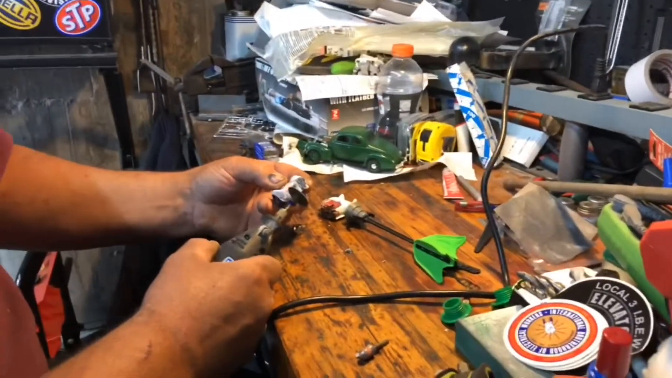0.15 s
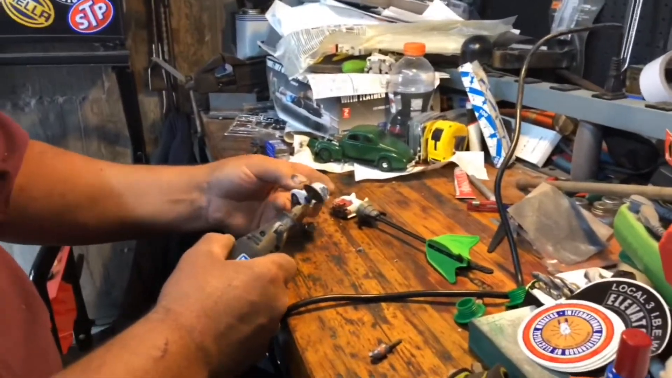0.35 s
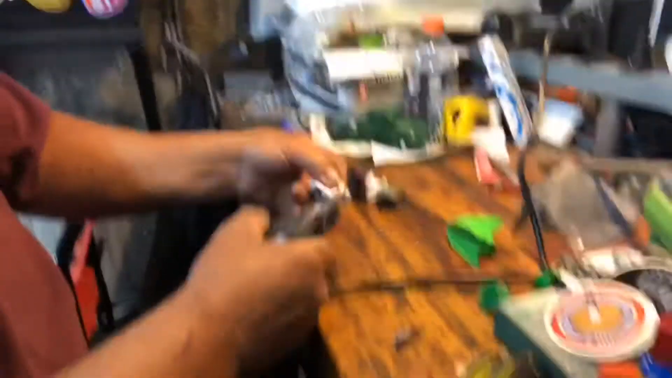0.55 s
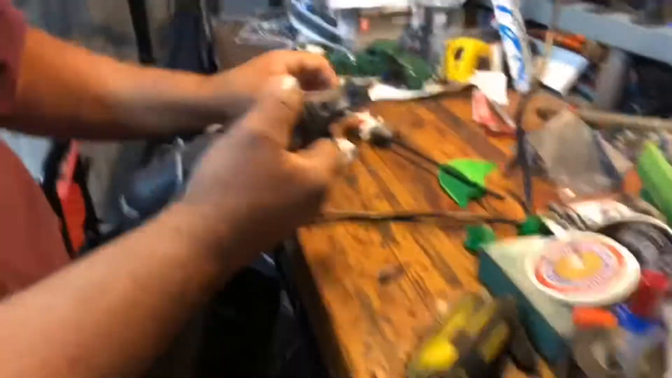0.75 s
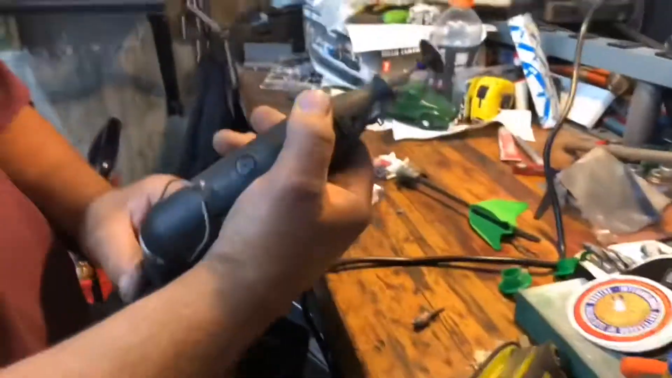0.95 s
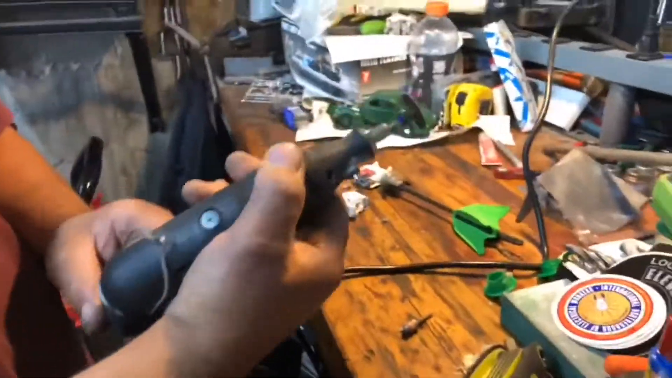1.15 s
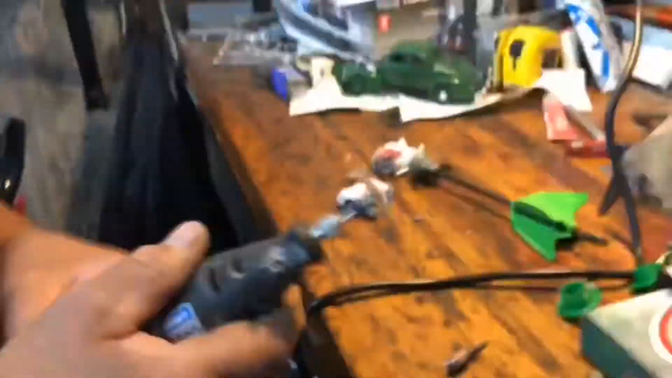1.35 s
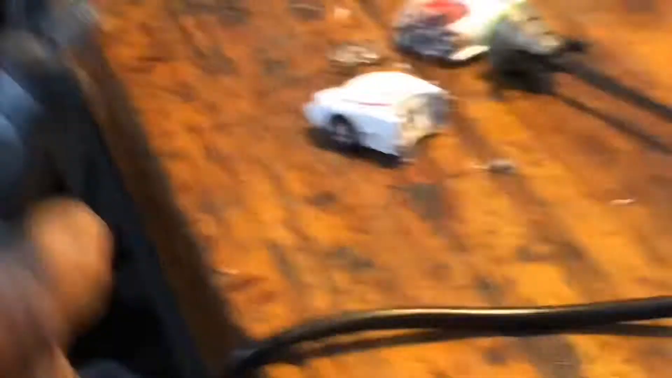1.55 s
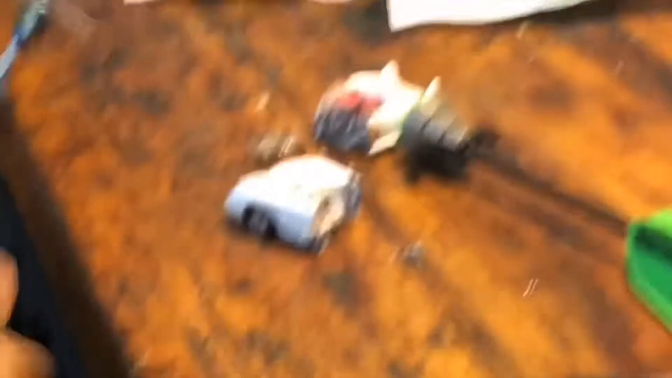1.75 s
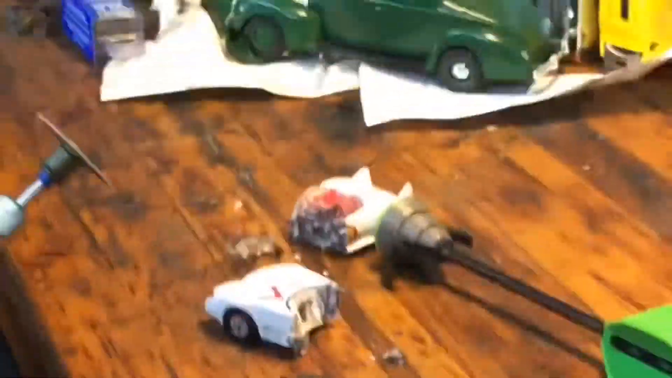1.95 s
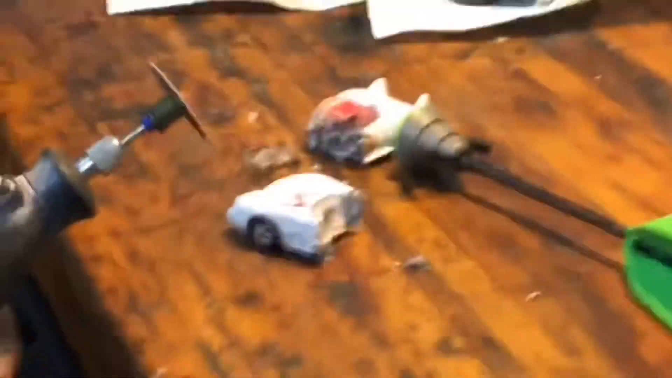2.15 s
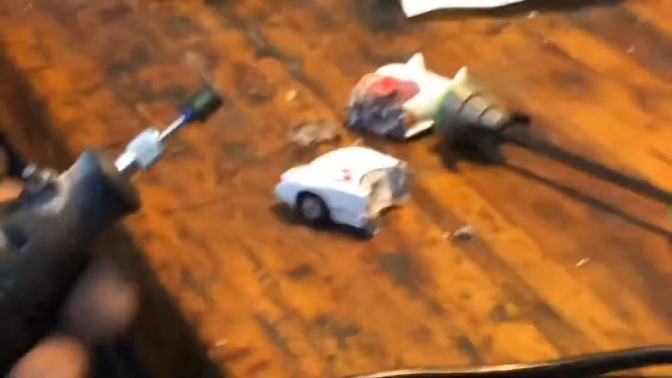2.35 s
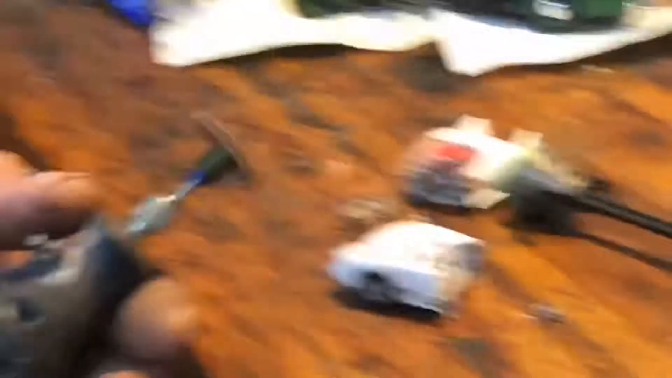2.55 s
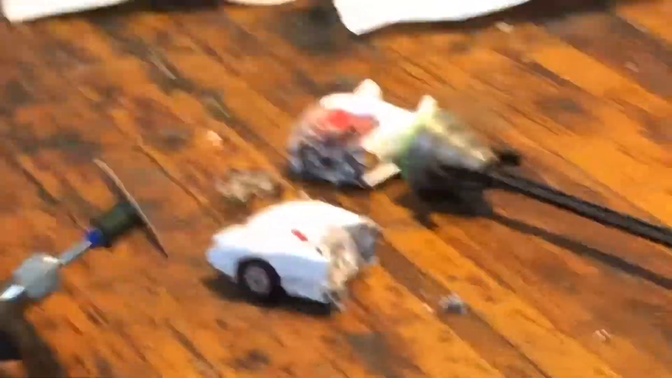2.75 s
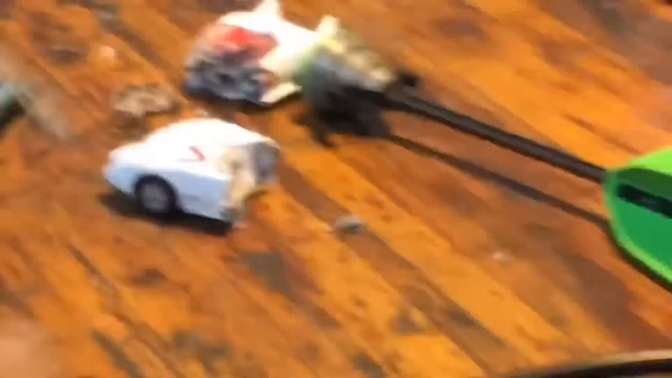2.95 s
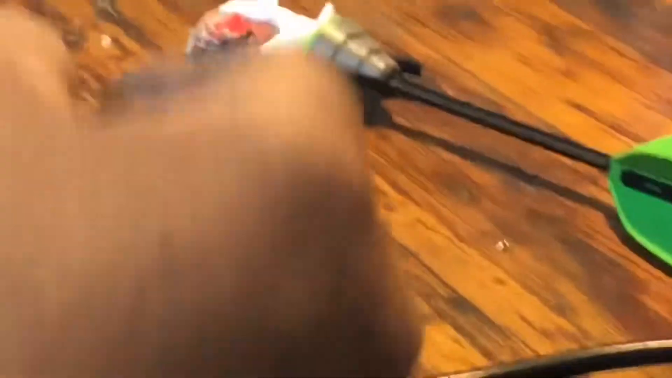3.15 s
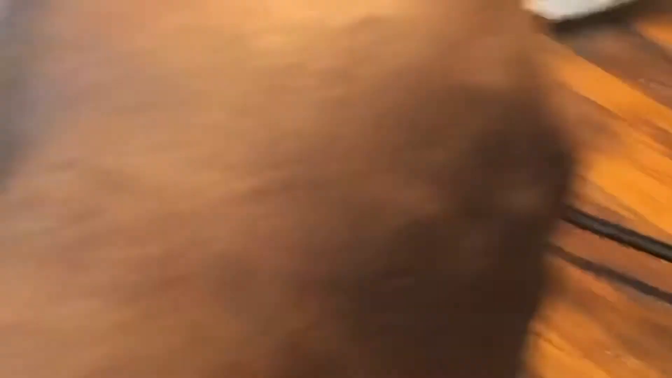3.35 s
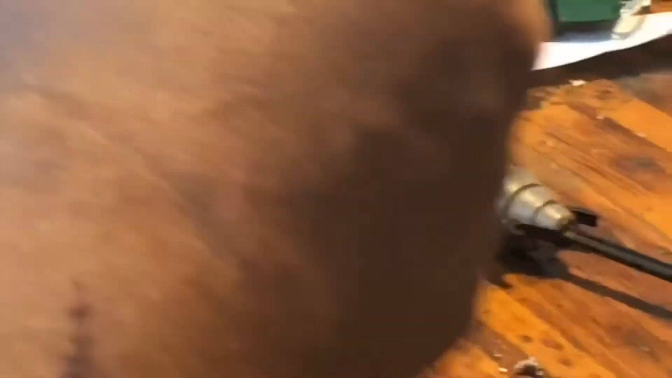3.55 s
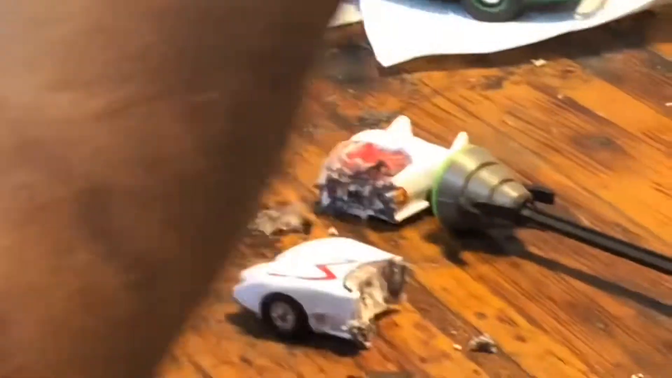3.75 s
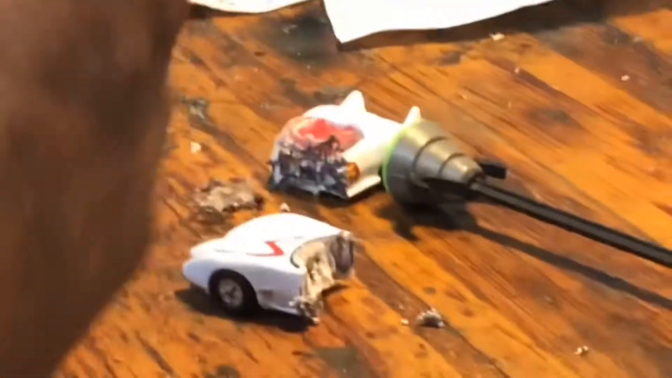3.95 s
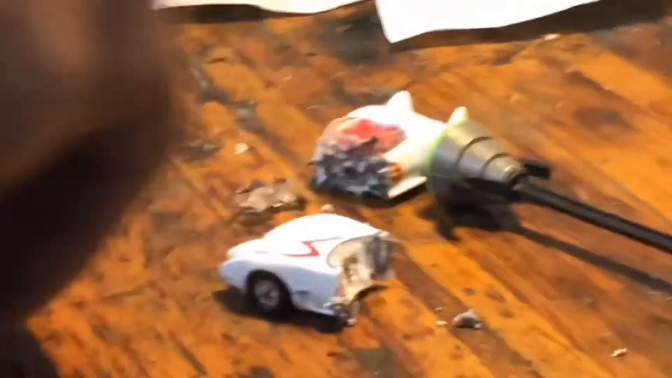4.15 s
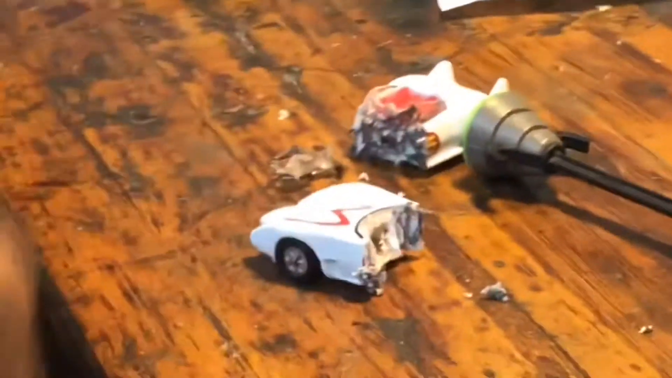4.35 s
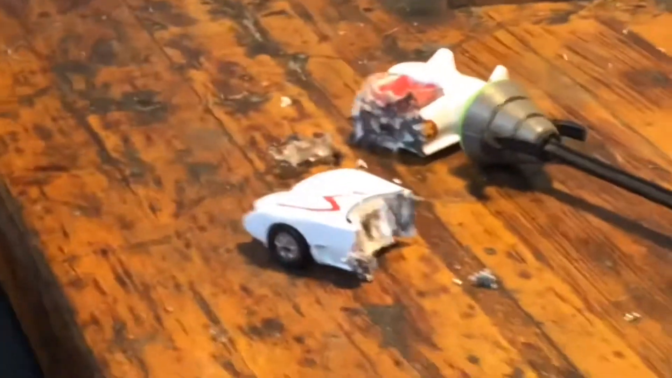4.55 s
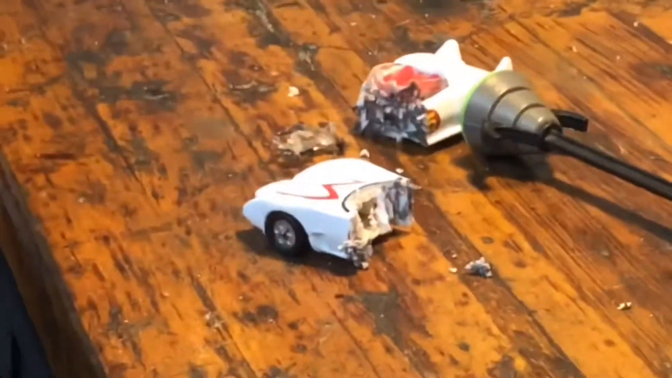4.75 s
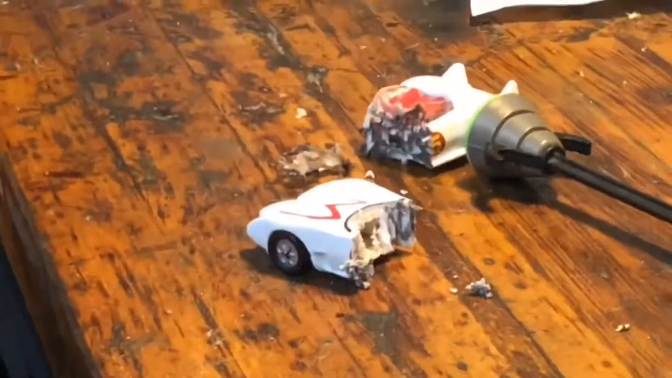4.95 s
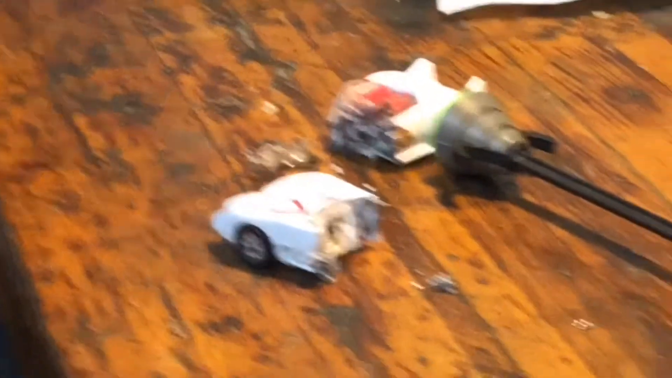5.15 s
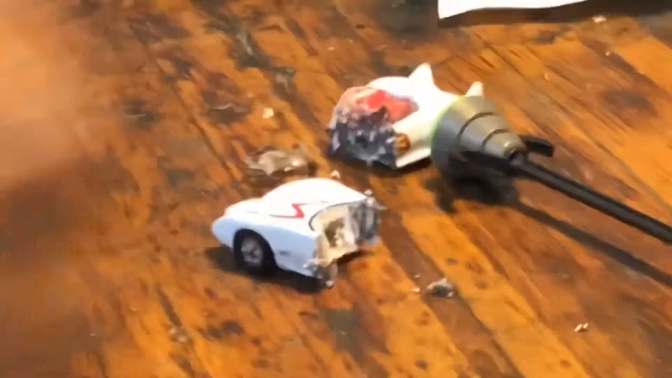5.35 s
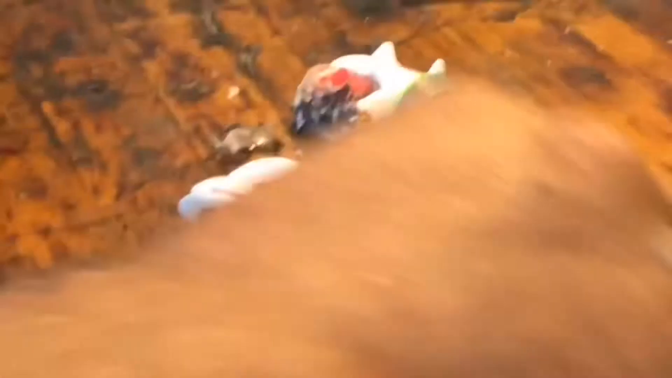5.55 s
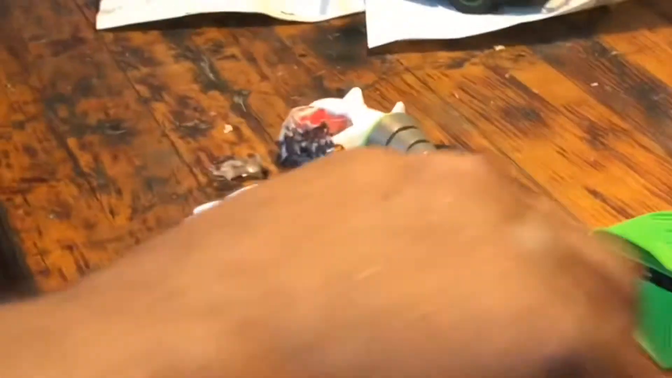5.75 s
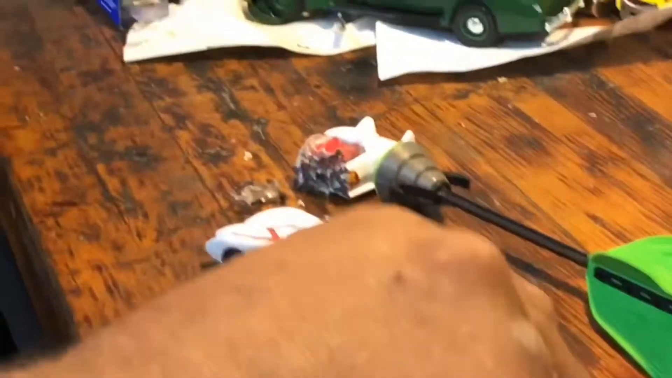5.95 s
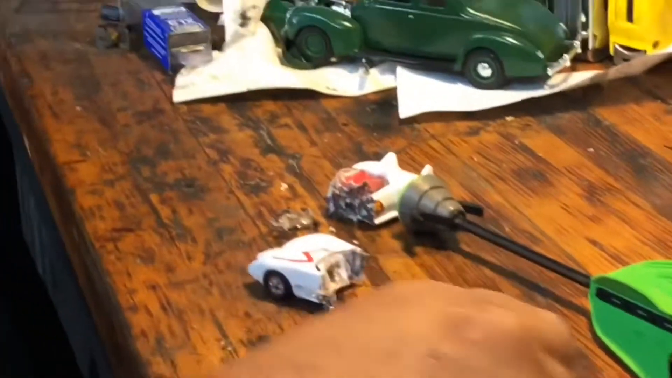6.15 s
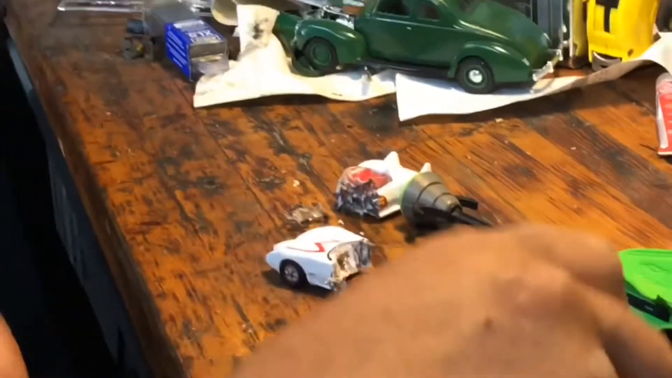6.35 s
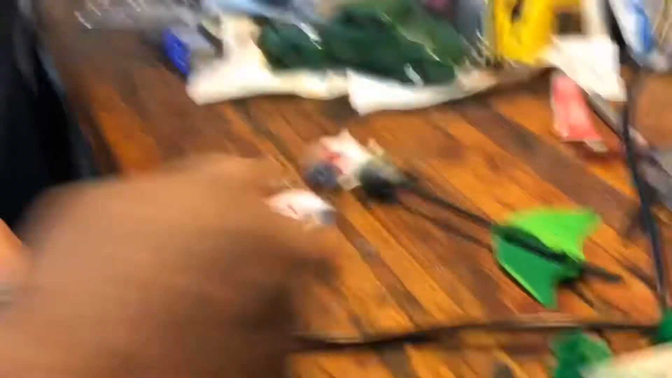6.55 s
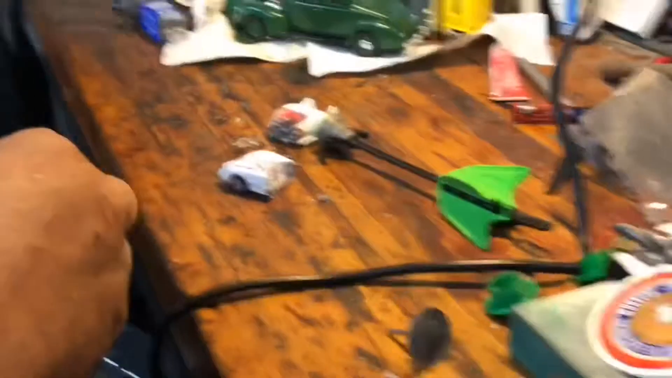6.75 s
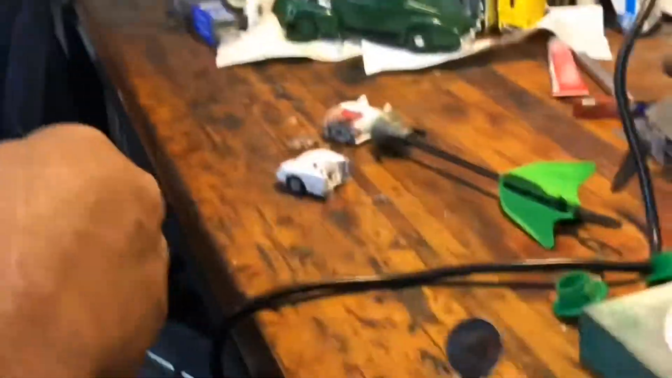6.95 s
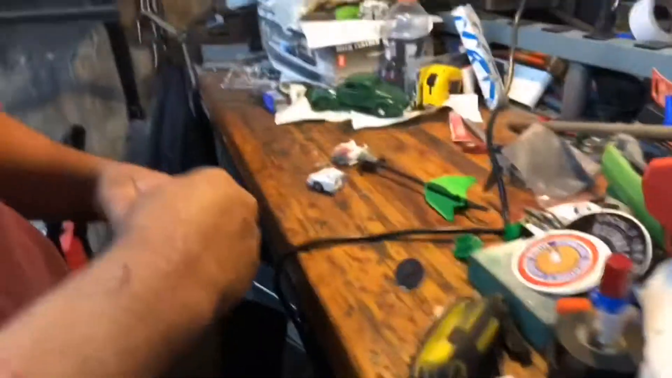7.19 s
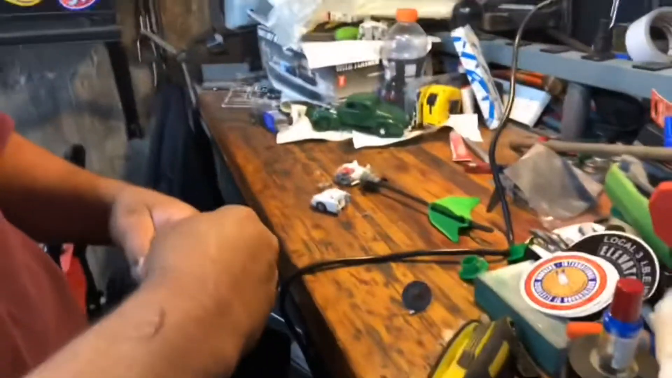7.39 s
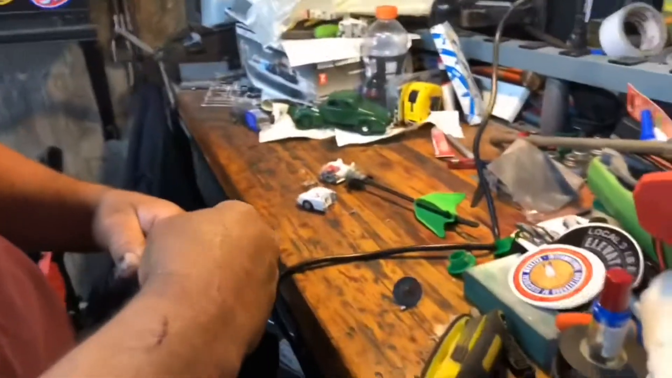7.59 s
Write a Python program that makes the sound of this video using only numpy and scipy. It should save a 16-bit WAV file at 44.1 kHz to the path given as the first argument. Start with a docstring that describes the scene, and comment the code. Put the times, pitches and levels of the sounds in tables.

```python
"""At a wooden workbench a corded rotary tool whines near 51000 rpm, is switched off and starts to slow;
the sound then skips ahead to its last slow turns. Shaft-locked sines and cyclic noise make the tool.
Knocks run through the bench top as falling chirps; small parts click as bursts with decaying modes;
coloured noise under rounded arches gives hands rubbing wood and the shell droning as it drags.
Fingers scuff, the cutting disc pings, and a quiet shop noise lies under the later part."""
import sys
import numpy as np
from scipy import signal
from scipy.fft import rfft, irfft, next_fast_len
from scipy.io import wavfile

SR = 44100
rng = np.random.default_rng(int(sys.argv[2]) if len(sys.argv) > 2 else 0)


def pcm_store(signal):
    """Save signal as 16-bit PCM."""
    levels = np.round(np.clip(np.atleast_2d(signal), -1, 1) * 32767)
    wavfile.write(sys.argv[1], SR, levels.astype(np.int16).T)


N = 336042
TIME = np.arange(N) / SR
OFF_S, SKIP_S = 0.968, 1.42   # switch-off, and the skip to the last turns
CUTOFF_HZ = 15750   # upper limit of the sound
CAGE_TURNS = 7   # shaft turns after which the bearing's balls are back in the same places

# spectrum of the fan's turbulent air: [f/Hz, relative level/dB]
FAN_AIR = [(5000, -29.5), (8000, -16), (9500, -5.5), (11500, 6), (14000, 0.5), (16000, -4.5)]
# spectrum of a hand's swish: [f/Hz, relative level/dB]
SWISH = [(120, -14.5), (280, -3.5), (430, 3.5), (700, 1.5), (1100, -6), (1600, -15), (2600, -15.5),
         (4000, -30), (8000, -49)]


def from_db(db):
    """Level to amplitude: 20 dB is a factor of ten."""
    return 10 ** (np.asarray(db) / 20)


def rms_one(x):
    """Normalisation to unit effective value."""
    return x / np.sqrt(np.mean(x ** 2) + 1e-20)


def in_time(rows):
    """Linear interpolation of each column after the first at every sample."""
    s, *columns = np.transpose(rows)
    return [np.interp(TIME, s, column) for column in columns]


def gain_at(points, hz):
    """Frequency response: level interpolated over logarithmic frequency."""
    f, db = np.transpose(points)
    return from_db(np.interp(np.log(np.maximum(hz, 1)), np.log(f), db))


def moving_gain(points, hz):
    """Frequency response followed along a gliding tone, renewed every 64 samples."""
    return gain_at(points, hz[::64]).repeat(64)[:N]


def drift(rate):
    """Slow random modulation of unit rms with about rate new values a second."""
    knots = rng.standard_normal(4096)
    return rms_one(np.interp(TIME * rate, np.arange(len(knots)), knots))


def coloured(x, colour):
    """Linear filtering by a spectrum, with the deepest bass eased off, to unit rms."""
    size = next_fast_len(N)
    hz = np.fft.rfftfreq(size, 1 / SR)
    spectrum = rfft(x, size) * gain_at(colour, hz) * hz / (hz + 20)
    return rms_one(irfft(spectrum, size)[:N])


def noise(colour):
    """Stationary random noise shaped to a spectrum."""
    return coloured(rng.standard_normal(N), colour)


def band(x, low_hz, high_hz):
    """Causal band-pass filtering."""
    return signal.sosfilt(signal.butter(2, [low_hz, high_hz], "band", fs=SR, output="sos"), x)


def swell(s, rise):
    """Critically damped response: a burst that peaks at 1 after its rise time and dies away."""
    age = np.clip((TIME - s) / rise, 0, 50)
    return age * np.exp(1 - age)


def stroke(middle, length):
    """Kinematics of a movement that gathers speed and slows: a rounded arch of height 1."""
    place = np.clip((TIME - middle) / length, -0.5, 0.5)
    return np.maximum(np.cos(np.pi * place), 0) ** 1.07


def order_tone(turns, multiple, flutter_db, smear):
    """Order synchronism: a tone locked to the shaft, wavering in level and in phase (radians)."""
    phase = 2 * np.pi * (multiple * turns + rng.random()) + smear * drift(70)
    return np.sqrt(2) * np.sin(phase) * from_db(flutter_db * drift(16))


def once_a_turn(turns, depth):
    """Amplitude modulation: brushes and fan blades chop the hiss in step with the shaft."""
    return 1 + depth * (np.cos(2 * np.pi * turns) + np.cos(4 * np.pi * turns)) / 2


def worn_track(laps, size):
    """Cyclic excitation: roughness recurs on every lap, a dense buzz whose mix keeps shifting."""
    one, other = signal.resample(rng.standard_normal((2, size)), 8192, axis=1)
    place = (laps % 1 * len(one)).astype(int)
    blend = 2.5 * drift(9)
    return np.cos(blend) * one[place] + np.sin(blend) * other[place]


def switched_off(drop_db, drop_s, fade_db_per_s):
    """Decay without drive: a smooth drop after switch-off and a steady fade."""
    age = np.maximum(TIME - OFF_S, 0)
    drop = np.sin(np.pi / 2 * np.minimum(age / drop_s, 1)) ** 2
    return from_db(-drop_db * drop - fade_db_per_s * age)


def shaft_orders(turns, loose, first_db, second_db, fourth_db):
    """Forced vibration: unbalance excites order 1, the motor's hum order 2, and order 4 joins them."""
    unbalance = order_tone(turns, 1, flutter_db=0.45 * loose ** 3, smear=0.03 * loose ** 3)
    unbalance *= from_db(first_db) * switched_off(drop_db=14, drop_s=0.19, fade_db_per_s=6)
    hum = order_tone(turns, 2, flutter_db=0.5, smear=0.04)
    hum *= from_db(second_db) * switched_off(drop_db=25, drop_s=0.028, fade_db_per_s=11)
    flare_db = 11 * swell(OFF_S, rise=0.018)   # order 4 rings out as the current breaks
    fourth = order_tone(turns, 4, flutter_db=0.7, smear=0.05)
    fourth *= from_db(fourth_db + flare_db) * switched_off(drop_db=43, drop_s=0.18, fade_db_per_s=10)
    return unbalance + hum + fourth


def housing_whine(turns, hz, loose):
    """Resonant radiation: the housing weights each shaft order at its moving frequency."""
    # weaker shaft orders at speed: [order, relative level/dB]
    weak_orders = [(3, -7), (5, -7), (6, -5), (7, -8), (8, -11), (9, -14), (10, -16), (11, -26), (12, -25),
                   (13, -25), (14, -26), (15, -27), (16, -26), (17, -29), (18, -17)]
    # housing response to the shaft orders: [f/Hz, relative level/dB]
    housing_response = [(1000, -24.5), (2000, -22.5), (2800, -14.5), (4000, -14.5), (4850, 7), (5500, -15),
                        (6500, -4), (8000, -15), (12000, -16), (16000, -30.5)]
    out = 0
    for order, db in weak_orders:
        radiated = moving_gain(housing_response, order * hz)
        tone = order_tone(turns, round(order), flutter_db=2.5 * loose, smear=0.012 * order * loose)
        out = out + from_db(db) * radiated / radiated[N // 16] * tone
    return out


def ball_bearing(turns, hz, loose):
    """Epicyclic kinematics: rolling balls give tones between the shaft orders."""
    # bearing tones: [offset/orders, relative level/dB]
    ball_offsets = [(.285, -3), (.43, -6), (.715, 0)]
    # housing response to the ball tones: [f/Hz, relative level/dB]
    ball_response = [(1000, -13.5), (2000, -20), (2800, -5.5), (4000, -7), (4850, -2), (5500, -6),
                     (6500, -8), (8000, -15), (12000, -19)]
    out = 0
    for offset, db in ball_offsets:
        for k in range(1, 10):
            order = k + offset
            tone = order_tone(turns, order, flutter_db=5, smear=0.5 * loose ** 2)
            out = out + from_db(db) * moving_gain(ball_response, order * hz) * tone
    return out


def brush_hiss(turns):
    """Sliding friction: broadband brush noise modulated by the rotation."""
    # brush noise spectrum: [f/Hz, relative level/dB]
    brush_colour = [(40, -60), (70, -28), (150, -11), (700, -16.5), (1300, -17), (2000, -9), (3000, -2.5),
                    (4800, 2), (6500, 3.5), (8300, -2.5), (9500, -7), (16000, -28)]
    chopped = noise(brush_colour) * once_a_turn(turns, depth=1.0)
    return rms_one(band(chopped, 90, CUTOFF_HZ)) * from_db(drift(60))


def bearing_buzz(turns):
    """Periodic roughness: the bearing's pattern repeats every few turns."""
    # buzz spectrum: [f/Hz, relative level/dB]
    buzz_colour = [(500, -51), (1500, -12.5), (3000, -4.5), (5000, 4), (6500, 2.5), (9000, -11.5),
                   (16000, -18)]
    return coloured(worn_track(turns / CAGE_TURNS, size=256), buzz_colour)


def fan_rush(turns, hz, age, unpowered):
    """Aerodynamic noise: turbulence modulated by the blades, with tones that stand out without power."""
    # fan and commutator tones: [order, level against the fan air/dB]
    singing_orders = [(4, -9), (5, -13), (7, -6), (8, -12), (16, -9), (18, -3), (21, -18), (23, -18),
                      (25, -16)]
    sing = 0
    for order, db in singing_orders:
        tone = order_tone(turns, order, flutter_db=3.5, smear=0.4)
        sing = sing + from_db(db) * tone * (order * hz < CUTOFF_HZ)
    blades = coloured(worn_track(turns / CAGE_TURNS, size=360), FAN_AIR)   # shaft wobble roughens the rush
    rush = from_db(-2.0) * noise(FAN_AIR) * once_a_turn(turns, depth=0.38)
    # the air grows by 10 dB/s as the vents swing round and fades by 27.5 dB/s after switch-off
    air_db = -36.5 - 10 * np.maximum(OFF_S - TIME, 0) - 27.5 * age
    return from_db(air_db) * (rush + from_db(-10.0) * blades + unpowered * sing)


def running_tool():
    """Rotor dynamics: all tones follow one shaft, which air drag slows exponentially after switch-off."""
    # tool turned in the hand: [t/s, powered shaft f/Hz, order 1 level/dB, order 2 level/dB,
    # order 4 level/dB, common bearing and brush level/dB], before the switch-off gains
    powered_run = [(0.0, 817, -34.5, -36.5, -39, -33), (0.024, 816, -35.5, -40.5, -55.5, -36),
                   (0.06, 829.4, -35, -38, -27, -31), (0.154, 848.4, -30.5, -31.5, -24.5, -29),
                   (0.288, 861, -30, -21.5, -28.5, -25.5), (0.456, 854.4, -29, -25, -32, -27.5),
                   (0.612, 849.6, -23.5, -29, -25.5, -28.5), (0.738, 851, -27, -40, -31.5, -26.5),
                   (0.82, 853.6, -31, -31, -27.5, -27.5), (0.96, 856.6, -30.5, -34, -36.5, -26)]
    powered_hz, first_db, second_db, fourth_db, bearing_db = in_time(powered_run)
    age = np.maximum(TIME - OFF_S, 0)
    hz = powered_hz * np.exp(-age / 0.88)   # time constant in s
    turns = np.cumsum(hz) / SR
    unpowered = np.minimum(age / 0.07, 1)
    loose = 1 + unpowered   # without drive the rotor floats in its bearings and the tones waver

    motor = from_db(-2.5 - 4.3 * unpowered) * housing_whine(turns, hz, loose)
    motor += from_db(-13.5) * ball_bearing(turns, hz, loose)
    motor += from_db(-5.5) * brush_hiss(turns) + from_db(-15.5) * bearing_buzz(turns)
    motor *= from_db(bearing_db) * switched_off(drop_db=5, drop_s=0.082, fade_db_per_s=32)
    orders = shaft_orders(turns, loose, first_db, second_db, fourth_db)
    # the hand shifts on the shell
    grip = from_db(-54.0) * unpowered * noise(SWISH) * from_db(2.5 * drift(40))
    return orders + motor + fan_rush(turns, hz, age, unpowered) + grip


def knock(thud_db, thud_hz, rap_db, contact_hz, tick_db, lag_cycles, thud_octaves, size=8192):
    """Dispersion: bending waves are slower the lower they are, so a blow arrives as a falling chirp."""
    # spectrum of the woody rap: [f/Hz, relative level/dB]
    rap_colour = [(40, -65.5), (120, -27), (300, -1.5), (440, -10), (600, 1), (900, -6), (1200, 2.5),
                  (1600, -6), (2200, 5.5), (3200, -16)]
    # spectrum of the contact tick: [f/Hz, relative level/dB]
    tick_colour = [(1000, -12.5), (2200, 0.5), (3800, 2), (6000, -9), (7500, -8.5), (9000, -28.5),
                   (16000, -35.5)]
    hz = np.maximum(np.fft.rfftfreq(size, 1 / SR), 1)
    octaves = np.log2(hz / thud_hz) / thud_octaves
    thud = (1 + octaves ** 2 / 4) ** -3.2 / (1 + (0.31 * thud_hz / hz) ** 4)
    ripple_db = 2.2 * np.interp(np.log2(hz), np.linspace(0, 15, 70), rng.standard_normal(70))
    ripple = from_db(ripple_db)
    rap = gain_at(rap_colour, hz) * ripple / (1 + (hz / contact_hz) ** 4.9)   # soft contact, little treble
    tick = gain_at(tick_colour, hz) * ripple
    parts = ((thud_db, thud), (rap_db, rap), (tick_db, tick))
    strength = sum((from_db(db) * rms_one(shape)) ** 2 for db, shape in parts) ** 0.5
    # this phase delays each frequency by lag_cycles of its own periods
    phase = -2 * np.pi * lag_cycles * np.log(hz / thud_hz)
    wave = irfft(strength * np.exp(1j * phase), size)
    return wave[:size // 2] * np.sqrt(SR / 50)


def bench():
    """Superposition: every knock on the bench is added at its moment."""
    # blows: [t/s, thud relative level/dB, thud f/Hz, rap relative level/dB, contact cut-off f/Hz,
    # tick relative level/dB]
    blows = [(0.293, -48.5, 249, -48, 1400, -55), (0.433, -46, 139, -51, 1400, -50),
             (0.548, -59, 242, -44, 1460, -36), (0.602, -56, 149.7, -46, 1420, -56),
             (0.861, -27.5, 150.7, -37, 1480, -69), (1.165, -45, 256, -37.5, 2405, -60),
             (1.222, -13.5, 209, -29, 2000, -48), (1.2366, -31.5, 236, -33, 2140, -42),
             (2.2294, -9.5, 84.7, -25.5, 1240, -64), (2.277, -31, 120, -38.5, 1850, -69),
             (2.76, -38, 118, -52, 1270, -79), (2.779, -43, 88, -33, 1230, -53),
             (3.914, -55.5, 300, -71, 915, -72), (5.038, -57.5, 177, -51, 1160, -70),
             (5.1022, -44, 125, -42.5, 1110, -83), (5.193, -40, 70, -39, 750, -66),
             (6.417, -39.5, 216, -42.5, 1070, -76), (6.4262, -41.5, 97, -37, 1144, -59.5),
             (6.6728, -9, 98.6, -22, 1000, -44.5), (6.6909, -60, 60.3, -33, 1100, -50.5),
             (6.9421, -26.5, 98.2, -32, 920, -85), (6.982, -42, 136, -33, 1075, -67)]
    out = np.zeros(N + SR)
    for s, *blow in blows:
        wave = knock(*blow, lag_cycles=1.5, thud_octaves=0.79)
        at = round(s * SR)
        out[at:at + len(wave)] += wave
    return out[:N]


def workshop(x, t60, wet_db):
    """Diffuse reverberation: a small cluttered room adds a short decaying tail."""
    t = np.arange(SR // 2) / SR
    tail = band(rng.standard_normal(len(t)), 370, 11000) * from_db(-60 * t / t60) * (t > 0.004)
    tail /= np.sqrt(np.sum(tail ** 2))
    return x + from_db(wet_db) * signal.fftconvolve(x, tail)[:N]


def light_touches():
    """Friction and resonance: fingers scuff plastic in grainy bursts, and the thin disc rings briefly."""
    # finger scuffs: [t/s, level/dB, rise/s]
    finger_scuffs = [(2.738, -56.5, 0.0081), (2.9, -63.5, 0.04), (3.411, -60, 0.0059),
                     (3.816, -57.5, 0.0055), (3.959, -51.5, 0.017), (4.959, -55.5, 0.0055),
                     (5.02, -60, 0.016), (5.774, -55, 0.0053), (6.406, -58, 0.022), (6.877, -64, 0.0032),
                     (7.063, -53.5, 0.0034), (7.096, -53.5, 0.011), (7.152, -55.5, 0.0048),
                     (7.474, -52.5, .008), (7.56, -54, 0.024)]
    # scuff spectrum: [f/Hz, relative level/dB]
    scuff_colour = [(500, 7), (1200, 5), (2400, 9), (3800, -3.5), (6000, -7), (9000, -24), (15000, -23)]
    # touches of the cutting disc: [t/s, peak level/dB, f/Hz]
    disc_pings = [(0.361, -28, 1595), (6.033, -51, 1510)]
    scuff_level = sum(from_db(db) * swell(s, rise) for s, db, rise in finger_scuffs)
    scuffs = scuff_level * noise(scuff_colour) * from_db(2 * drift(400))
    pings = sum(from_db(db) * swell(s, rise=0.0039) * np.sin(2 * np.pi * hz * TIME)
                for s, db, hz in disc_pings)
    return scuffs + pings


def coasting_tool():
    """Resonance crossing: orders of the slowing rotor flare in turn as they slide through the housing."""
    # orders of rotor and bearings, the 16th from the commutator: [order, relative level/dB]
    coast_orders = [(5, 6), (6.5, 3), (7, 5), (9, -4), (15, -4), (16, 14), (18, -3), (19.5, -3), (22, -4),
                    (23, 1), (24, -2), (25, -1), (30.6, 4), (32, 3), (39, 1), (41, 0)]
    # housing response while coasting: [f/Hz, relative level/dB]
    coast_response = [(200, -27.5), (600, -33), (1200, -26.5), (1650, -17.5), (2080, 4.5), (2550, -13.5),
                      (3100, -12), (3600, -17.5), (4700, -10), (6000, -30), (9000, -41)]
    # spectrum of the rattle: [f/Hz, relative level/dB]
    rattle_colour = [(60, -30), (300, -6.5), (600, 0), (850, -8.5), (1150, 8.5), (1550, -2.5), (2080, 9),
                     (2700, -4.5), (4000, -12), (8000, -35.5)]
    # spectrum of the brushes: [f/Hz, relative level/dB]
    coast_brush_colour = [(1500, -27), (3300, 3), (4500, -5), (5800, 0.5), (7500, -7), (9500, -13.5),
                          (16000, -37.5)]
    start_hz, friction_hz_per_s = 256, 185   # friction slows the rotor evenly
    hz = np.maximum(start_hz - friction_hz_per_s * (TIME - SKIP_S), 0)
    turns = np.cumsum(hz) / SR

    def vigour(knee_hz):
        """Saturation: near 1 well above the knee, in proportion to speed below it."""
        return hz / np.hypot(hz, knee_hz)

    unbalance = from_db(-50) * (hz / start_hz) ** 2 * order_tone(turns, 1, flutter_db=0.5, smear=0.4)
    tones = sum(from_db(db) * gain_at(coast_response, order * hz)
                * order_tone(turns, order, flutter_db=4.5, smear=0.8) for order, db in coast_orders)
    whine = from_db(-46.5) * vigour(knee_hz=120) ** 1.4 * tones
    rattle = from_db(-43.5 + 2.2 * drift(44.5)) * vigour(knee_hz=100) * noise(rattle_colour)
    brush = from_db(-44.5 + 1.4 * drift(29.9)) * vigour(knee_hz=120) ** 1.22 * noise(coast_brush_colour)
    air = from_db(-48.5) * vigour(knee_hz=135) ** 3.06 * noise(FAN_AIR)
    return unbalance + whine + (rattle + brush) * once_a_turn(turns, depth=0.2) + air


def shop_air():
    """Ambient noise: the quiet of the shop, wavering a little."""
    # spectrum of the quiet shop: [f/Hz, relative level/dB]
    shop_colour = [(30, 4.5), (150, 1), (400, -7.5), (1000, -10), (4000, -20.5), (8000, -30.5),
                   (15000, -36.5)]
    return from_db(-62 + 0.32 * drift(8)) * noise(shop_colour)


def handling():
    """Stick-slip friction: each stroke over the wood gives a low rub and a grainy swish."""
    # strokes of hand, arm and tool: [middle t/s, length/s, low rub level/dB, swish level/dB]
    hand_strokes = [(1.847, 0.61, -52, -59), (2.38, 0.41, -43, -49), (2.752, 0.11, -45, -52.5),
                    (3.003, 1, -62, -63.5), (3.549, 0.41, -69, -69.5), (3.949, 0.13, -57, -59),
                    (4.05, 0.57, -63.5, -65.5), (5.702, 1, -61, -67.5), (6.259, 0.3, -59.5, -65),
                    (6.41, 0.083, -47.5, -53), (6.6, 0.58, -70, -66), (6.858, 0.23, -53, -48),
                    (7.39, 0.3, -63.5, -56), (7.62, 0.18, -60, -49.5)]
    # spectrum of the rub: [f/Hz, relative level/dB]
    rub_colour = [(25, -5.5), (50, -4), (100, 2), (170, -1), (260, -7.5), (500, -18.5), (1500, -49.5)]
    rub = sum(from_db(db) * stroke(s, length) for s, length, db, _ in hand_strokes)
    swish = sum(from_db(db) * stroke(s, length) for s, length, _, db in hand_strokes)
    grain_db = 4.1 * drift(40) + 1.5 * drift(320)   # the fast part is stick and slip of skin on wood
    return rub * noise(rub_colour) * from_db(1.5 * drift(23)) + swish * noise(SWISH) * from_db(grain_db)


def dragging():
    """Friction-driven resonance: sliding on the wood sets the tool's hollow shell droning."""
    # drags over the bench: [middle t/s, length/s, level/dB]
    shell_drags = [(1.842, 0.27, -41.5), (2.411, 0.12, -33.5)]
    # spectrum of the shell's drone: [f/Hz, relative level/dB]
    drone_colour = [(200, -6), (330, -3), (420, 12.5), (470, 5), (560, -6), (660, -0.5), (900, -57)]
    level = sum(from_db(db) * stroke(s, length) for s, length, db in shell_drags)
    return level * noise(drone_colour) * from_db(2.8 * drift(34.62))


def small_parts(crack_t60=0.032, ring_db=-5.5, count=8000):
    """Modal impact: each touch gives a short uneven crack and rings the part's modes in three registers."""
    # clicks of small hard parts: [t/s, body, ring and top relative level/dB]
    part_clicks = [(1.903, -62, -37, -38.5), (3.177, -39.5, -40, -46), (3.944, -47, -49, -74),
                   (4.419, -50.5, -50.5, -60.5), (4.526, -62, -56, -57.5), (5.042, -52, -67, -85),
                   (5.52, -36, -33, -44.5), (5.540, -49, -53, -58), (5.558, -35, -51, -60),
                   (5.580, -41.5, -59, -72), (6.816, -61, -54.5, -81)]
    # modes before random spread: [f/Hz, relative level/dB, t60/s]
    part_modes = [(790, -5, 0.026), (1070, -28, 0.041), (1250, -18, 0.033), (2040, 9.5, 0.087),
                  (3120, 16.5, 0.03), (3540, -27, 0.092), (4000, -45, 0.045), (5770, -27, 0.034),
                  (6700, -10, 0.016), (8000, -21, 0.062), (9890, -5, 0.022), (11200, 4, 0.032),
                  (13000, -11, 0.02)]
    registers_hz = [(600, 1900), (1900, 7000), (7000, 15500)]   # body, ring, top
    out = np.zeros(N + count)
    t = np.arange(count) / SR
    onset = 1 - np.exp(-t / 0.0014)
    for s, *levels in part_clicks:
        at = round(s * SR)
        knots = t[::100]
        chatter = from_db(4 * np.interp(t, knots, rng.standard_normal(len(knots))))
        for (low, high), db in zip(registers_hz, levels):
            burst = rng.standard_normal(count) * chatter * from_db(-60 * t / crack_t60)
            crack = band(burst, low, high)
            ring = np.zeros(count)
            for hz, mode_db, t60 in part_modes:
                if low <= hz < high:
                    decay = from_db(mode_db + rng.normal(0, 5.6) - 60 * t / t60)
                    ring += decay * np.sin(2 * np.pi * hz * rng.normal(1, 0.052) * t)
            click = rms_one(crack) + from_db(ring_db) * rms_one(ring)
            out[at:at + count] += from_db(db - 17.0) * click * onset
    return out[:N]


def scene():
    """Superposition: the tool at speed, then its last turns, with the work at the bench."""
    later = np.clip((TIME - SKIP_S) * 200, 0, 1)   # a 5 ms crossfade
    last_turns = coasting_tool() + dragging() + handling() + shop_air()
    tool = (1 - later) * running_tool() + later * last_turns
    knocks = workshop(bench(), t60=0.067, wet_db=-27.0)
    touches = workshop(small_parts() + light_touches(), t60=0.26, wet_db=-9.5)
    return (tool + knocks + touches)[None]


def record(dry):
    """Band limitation: the microphone thins the deep bass, and the top is cut steeply."""
    thinned = signal.sosfilt(signal.butter(1, 20, "high", fs=SR, output="sos"), dry)
    return signal.sosfilt(signal.ellip(12, 0.1, 80, CUTOFF_HZ, fs=SR, output="sos"), thinned)


dry = scene()
out = record(dry)
pcm_store(out)
```